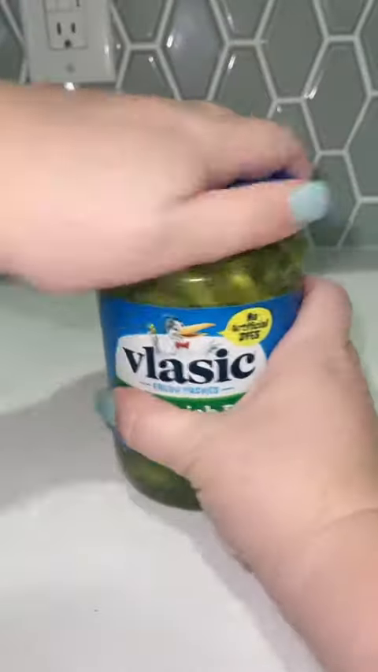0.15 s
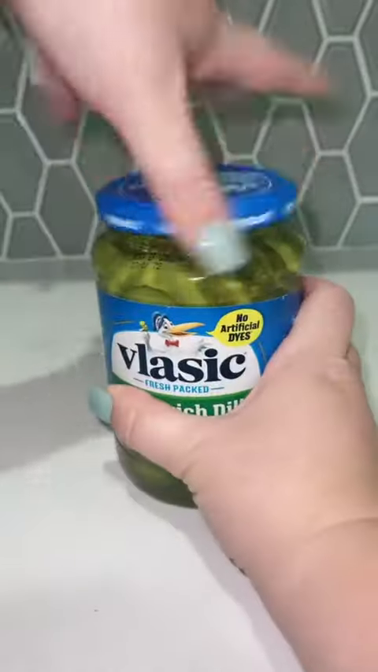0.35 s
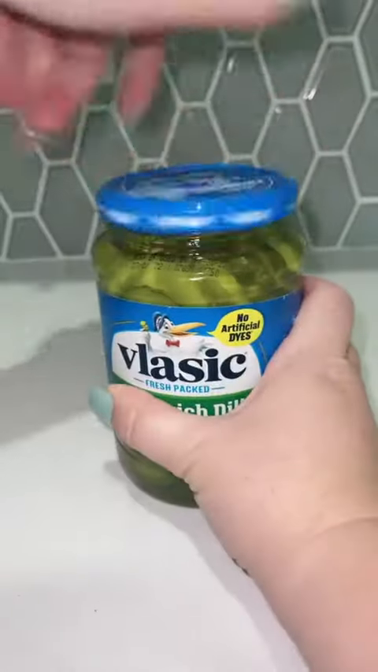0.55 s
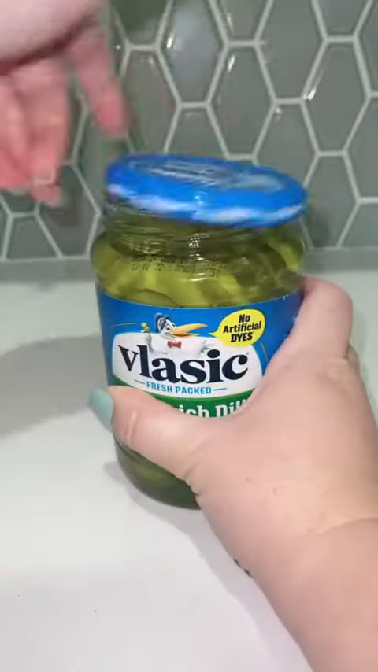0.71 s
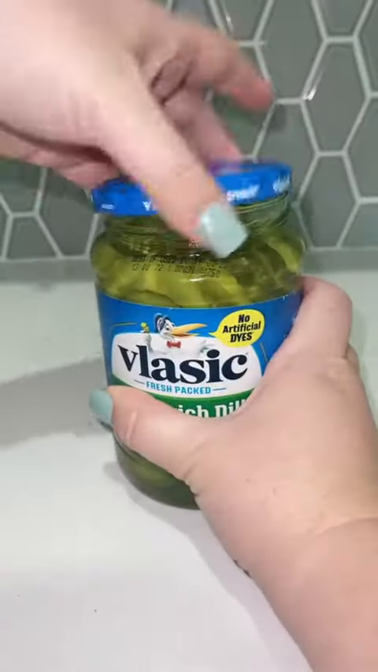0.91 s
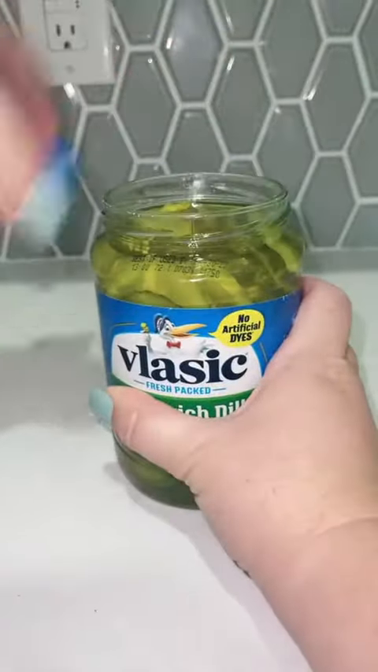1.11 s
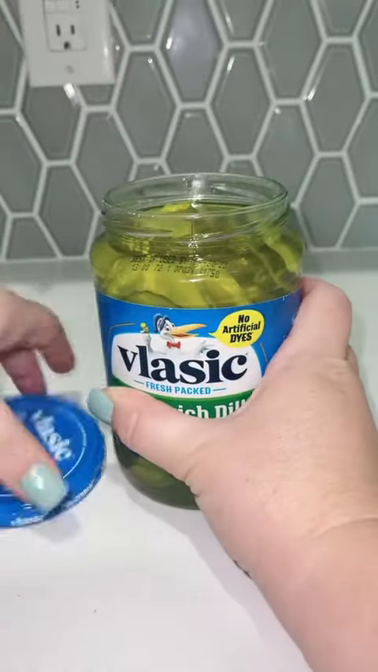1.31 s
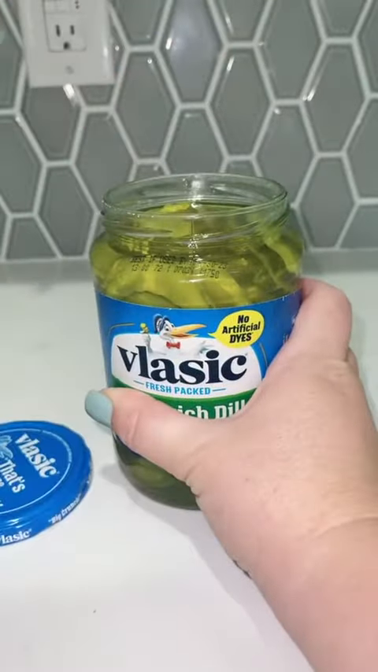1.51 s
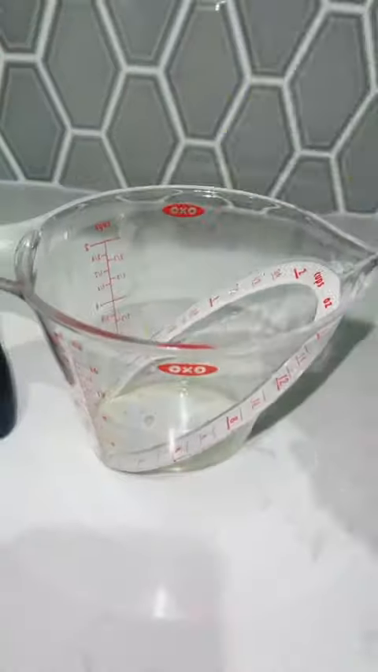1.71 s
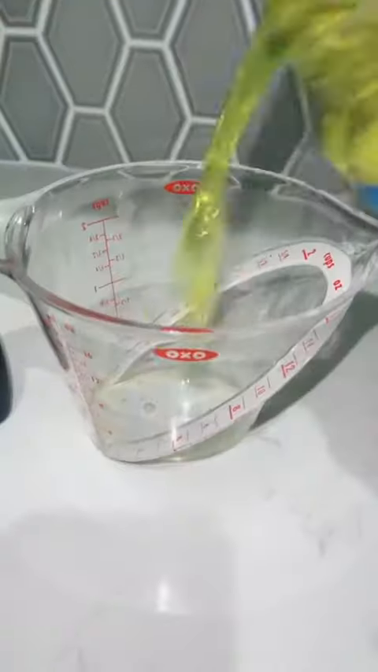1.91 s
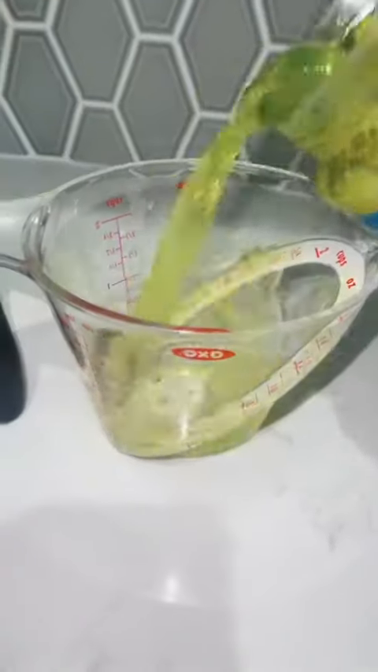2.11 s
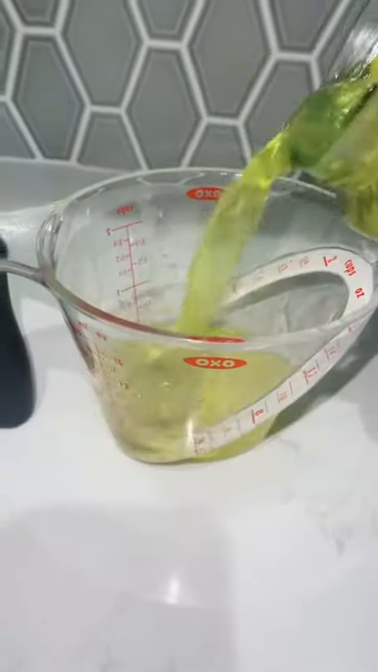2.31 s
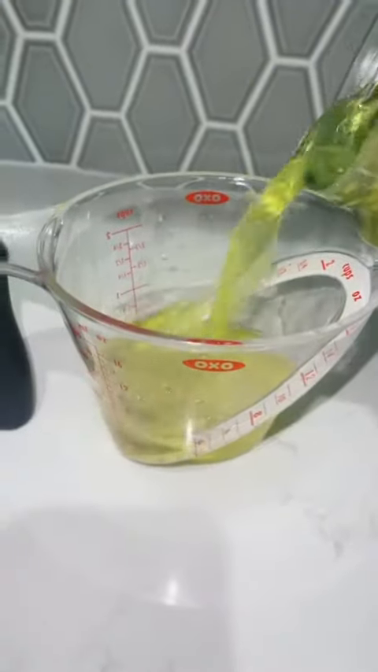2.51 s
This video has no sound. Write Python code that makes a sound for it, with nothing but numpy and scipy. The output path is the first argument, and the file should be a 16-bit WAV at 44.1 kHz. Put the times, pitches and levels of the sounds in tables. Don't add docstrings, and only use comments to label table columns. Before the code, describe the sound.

A thin steel lid twists off a glass jar: soft palm touches at 0.1 s, then gritty scrapes and metallic rattles from 0.2 to 0.85 s, loudest near 0.73. At 1.3 s it clacks onto a stone counter, rocks and settles by 1.55. Near-silence from 1.72 to 1.83 s, then brine trickles, splashing and bubbling in a plastic jug from about 2 s. Close phone microphone, low hum, small tiled kitchen.

```python
import sys
import numpy as np
from scipy import signal
from scipy.fft import rfft, irfft, next_fast_len
from scipy.io import wavfile
from scipy.ndimage import uniform_filter1d

SR = 44100
rng = np.random.default_rng(int(sys.argv[2]) if len(sys.argv) > 2 else 0)


def to_wav(sig):
    pcm = np.clip(np.atleast_2d(sig), -1, 1) * 32767
    pcm = np.round(pcm).astype(np.int16)
    wavfile.write(sys.argv[1], SR, pcm.T)


def makeup_ratio(level_db):
    decades = np.asarray(level_db, float) / 20
    return 10 ** decades


N = 114660

ROOM_T60_S, ROOM_TREBLE_T60_S, ROOM_DB = 0.53, 0.15, -19
CUT_S, BACK_S, CUT_FALL_S, CUT_DB = 1.722, 1.829, 0.0022, -52
TOP_HZ = 15650

# frequency [Hz], density [dB per Hz].
HUM_SPECTRUM = [(25, -14), (70, -7.5), (125, 2.5), (175, -10), (240, -8.5), (500, -17), (3500, -26.5),
                (10000, -50.5)]
# time [s], gain [dB].
HUM_GAIN = [(0, 1), (.3, 7.5), (1.25, 6.5), (1.32, 1.5), (1.7, 6), (1.83, -10.5), (1.92, -16), (1.95, -6.5),
            (2.2, 2.5), (2.6, 8)]
# frequency [Hz], density [dB per Hz].
MIC_HISS_SPECTRUM = [(9000, -30), (12000, -5.5), (14000, 2), (16000, 0)]
HUM_DB, MIC_HISS_DB = -59.5, -85.5

# time [s], level [dB].
STREAM = [
    (1.93, -93),
    (2.055, -77.5),
    (2.08, -54),
    (2.24, -48),
    (2.3, -55),
    (2.6, -54),
]
# frequency [Hz], density [dB per Hz].
FIZZ_SPECTRUM = [(250, -49), (557, -4.5), (1420, 0.5), (1760, -3.5), (2400, 0), (3280, -5), (11500, -19.5),
                 (15000, -18)]
# start [s], level [dB], bubble pitch [Hz], decay [s], spray [dB].
SPLASHES = [(1.953, -57, 1553, 0.027, -10), (1.986, -63, 5870, 0.016, 8.5), (2.011, -50, 5680, 0.021, -1.5),
            (2.069, -46, 2130, 0.013, -3.5), (2.08, -34.5, 768, 0.009, -14),
            (2.086, -34.5, 4550, 0.0057, -18), (2.142, -37.5, 5620, 0.0045, -7),
            (2.148, -36, 2290, 0.0058, -8.5), (2.158, -34.5, 800, 0.011, -14),
            (2.19, -26.5, 770, 0.0051, -33), (2.19, -28.5, 1470, 0.0027, -30),
            (2.228, -25, 1420, 0.0052, -21), (2.327, -42.5, 1455, 0.0093, -9.5),
            (2.371, -37.5, 2275, 0.0083, -14.5), (2.39, -43, 1420, .007, -26),
            (2.431, -41.5, 4970, .006, -7), (2.453, -38, 1420, .008, -18), (2.476, -42, 2430, .012, -0.5),
            (2.537, -39.5, 4220, 0.0036, -18), (2.547, -32.5, 510, 0.0088, -27),
            (2.547, -31, 1380, 0.0062, -28), (2.589, -36, 2260, 0.0043, -15.5),
            (2.592, -32.5, 1320, .006, -18)]
# pitch [Hz], level [dB], time to fall 60 dB [s].
JUG_MODES = [(820, -3, 0.056), (1420, -1.5, 0.06), (1890, -1, 0.022), (2420, 2.5, 0.014),
             (3120, -22, 0.045), (4240, -1, 0.024)]
JUG_DB, FIZZ_DB, FLICKER_DB, BUBBLE_DB, PLOP_DB = -11.5, 3, 1.8, -11, -0.5
GLIDE = 0.093

# start [s], length [s], level [dB], fade over its length [dB].
SLIDES = [
    (0.203, 0.024, -43.5, -0.5),
    (0.303, 0.062, -26.5, -10.5),
    (0.374, 0.045, -35, -4.5),
    (0.508, 0.11, -25.5, -5),
    (.697, .02, -27.5, -4),
    (0.733, 0.041, -23.5, -5.5),
    (0.779, .11, -43.5, -10.5),
    (1.293, 0.041, -34, 2),
    (1.339, 0.11, -32, -6.5),
    (1.447, 0.26, -54, -17.5),
]
# frequency [Hz], density [dB per Hz].
RIM_SPECTRUM = [(3000, -30), (6000, -8), (9500, -4.5), (11300, -12), (13300, -3.5), (16000, -0.5)]
# pitch [Hz], width [Hz], level over the hiss [dB].
RIM_MODES = [(6500, 160, 8), (8450, 170, 5), (9920, 340, 4.5), (12260, 280, 2.5), (13600, 380, 5)]

# start [s], level [dB], favoured pitch [Hz], decay [s], rise [s].
PALM = [
    (.112, -32, 600, .012, 0.0086),
    (.13, -37.5, 700, .015, 0.0052),
    (.158, -30, 520, .012, 0.01),
    (.212, -22.5, 680, .015, 0.0052),
    (.92, -37, 340, .025, 0.0027),
]
# pitch [Hz], level [dB], time to fall 60 dB [s].
JAR_MODES = [(340, -1.5, 0.09), (575, -10, .025), (680, -7, 0.1)]

# start [s], level [dB], favoured pitch [Hz], scrape decay [s], rise [s].
TWIST = [(.196, -18, 2230, 0.0078, 0.0084), (.214, -14.5, 2040, 0.005, 0.0043),
         (.236, -29.5, 2330, 0.022, 0.02), (.29, -20, 2330, 0.0033, 0.0045), (.301, -9, 2330, 0.01, 0.0032),
         (.322, -18, 2330, 0.013, 0.006), (.372, -20, 1610, 0.033, 0.0039),
         (.398, -34.5, 2510, 0.01, 0.0076), (.463, -20, 1650, 0.022, 0.0013),
         (.484, -24, 530, 0.011, 0.0045), (.503, -9.5, 1160, 0.019, 0.0023),
         (.533, -10, 2510, 0.026, 0.00093), (.566, -11.5, 1170, 0.0061, 0.02),
         (.592, -17.5, 1170, 0.027, 0.0076), (.67, -19.5, 1180, 0.021, 0.0027),
         (.695, -8.5, 1630, 0.011, 0.0083), (.728, -9.5, 2320, 0.0083, 0.007),
         (.752, -16.5, 2320, 0.019, 0.0038), (.81, -20, 2370, 0.01, 0.0073),
         (.85, -21.5, 1070, 0.01, 0.0072), (.916, -33, 1060, 0.0069, 0.0048),
         (.929, -27.5, 1170, 0.014, 0.002)]
# start [s], level [dB], favoured pitch [Hz], scrape decay [s], rise [s].
DROP = [
    (1.292, -24.5, 2310, 0.019, 0.0082),
    (1.303, -11, 4030, 0.014, 0.016),
    (1.315, -7.5, 1490, 0.0037, 0.00033),
    (1.34, -15.5, 4030, 0.014, 0.018),
    (1.366, -22, 2330, 0.03, 0.0039),
    (1.399, -16.5, 2330, 0.011, 0.0021),
    (1.422, -20, 6460, 0.016, 0.0095),
    (1.485, -32.5, 2330, 0.016, 0.01),
    (1.515, -35.5, 2330, 0.036, 0.0035),
    (1.56, -49, 2330, 0.045, 0.0051),
]
# start [s], level [dB], favoured pitch [Hz].
THREAD_KNOCKS = [(0.2154, -16.5, 2080), (0.3036, -14, 2330), (0.3048, -9.5, 2330), (.328, -15, 2330),
                 (.339, -19, 4070), (0.5052, -12, 1160), (0.51, -11.5, 2330), (0.5141, -12, 1160),
                 (0.5348, -12, 1160), (0.5377, -11.5, 2520), (.575, -9, 1160), (0.5784, -7.5, 2520),
                 (.596, -17, 1160), (0.6716, -14.5, 1180), (0.6981, -13, 1640), (.705, -10.5, 1640),
                 (.712, -13.5, 1080), (0.7314, -7, 600), (.735, -10.5, 2310), (.741, -11.5, 6480),
                 (0.8175, -21, 1160), (.821, -18.5, 2310), (0.9325, -27.5, 1150)]
# start [s], level [dB], favoured pitch [Hz].
COUNTER_KNOCKS = [
    (1.309, -16, 1490),
    (1.3159, -4, 1490),
    (1.32, -10, 1490),
    (1.347, -16.5, 4060),
    (1.352, -15, 4025),
    (1.377, -20, 2330),
    (1.4019, -13.5, 2330),
    (1.4054, -13.5, 2330),
    (1.432, -20.5, 6480),
]
# pitch [Hz], level [dB], time to fall 60 dB [s].
LID_HELD_MODES = [(552, -14.5, 0.18), (616.4, -7.5, 0.055), (909, -8.5, 0.12), (1080, -8, 0.066),
                  (1168, -7.5, .08), (1647, -6, 0.064), (2210, -16.5, .03), (2314, -4, 0.07),
                  (2503, -6, .08), (3263, -7.5, 0.091), (3780, -13.5, 0.11), (4080, -8, 0.16),
                  (4525, -8, 0.13), (6480, -4.5, 0.039)]
# pitch [Hz], level [dB], time to fall 60 dB [s].
LID_FREE_MODES = [(600, -13, 0.19), (916, -20, .2), (1490, -4.5, 0.052), (1674, -7.5, 0.0787),
                  (2330, 0, 0.067), (2535, -10, .1), (2790, -15, 0.083), (3776, -15.5, 0.26),
                  (4032, -1, 0.087), (4473, -22.5, .06), (5440, -10, 0.078), (6490, -5.5, .08),
                  (8550, -11.5, 0.0577), (10250, -11.5, .05)]
# frequency [Hz], density [dB per Hz].
GRIT_SPECTRUM = [(150, -50), (450, -16.5), (1200, 0.5), (2400, -3.5), (4300, -1.5), (8000, -6),
                 (13000, -3.5), (16000, -12)]
# frequency [Hz], width [Hz], depth [0-1].
NOTCHES = [(5150, 330, .97), (10750, 450, .85), (14750, 350, .8)]
# start [s], end [s].
FLAT_SPANS = [
    (.51, .69),
    (1.33, BACK_S),
]

HELD_DB, FREE_DB, HELD_GRIT_DB, FREE_GRIT_DB = -9, -12, -9.5, -12.5
FAVOUR_DB_PER_OCT, LUCK_DB = 10.5, 1
CHATTER_PER_S, CHATTER_DB = 8000, 3
WANDER = 0.003
SUSTAIN, STOP_DECAYS = 1.5, 2.6
RIPPLE_DB, RIPPLE_HZ = 3, 170
SOFT_DULL = 0.45
KNOCK_RING_DB, CRACK_DB, CRACK_S = 24.5, -1.5, 0.00073


def unit(x):
    return x / np.sqrt(np.mean(x ** 2) + 1e-20)


def noise():
    return rng.standard_normal(N)


def curve(rows):
    return np.interp(np.arange(N) / SR, *np.array(rows).T[:2])


def colour(x, points):
    hz, db = np.array(points).T
    size = next_fast_len(N)
    f = np.maximum(np.arange(size // 2 + 1) * SR / size, 1)
    gain = makeup_ratio(np.interp(np.log(f), np.log(hz), db))
    return irfft(rfft(x, size) * gain, size)[:N]


def resonate(x, hz, width):
    return signal.lfilter(*signal.iirpeak(hz, hz / width, SR), x)


def walk(rate):
    k = int(SR / rate)
    steps = np.repeat(rng.standard_normal(N // k + 1), k)
    return unit(uniform_filter1d(uniform_filter1d(steps, k), k)[:N])


def chatter(per_s, spread_db):
    when, sign, size = rng.random((3, N))
    hits = (when < per_s / SR) * np.sign(sign - 0.5)
    return unit(hits * makeup_ratio(-spread_db * np.log(size + 0.02)))


def ring(x, hz, t60):
    r = np.exp(-np.log(1000) / (t60 * SR))
    turn = np.exp(2j * np.pi * hz / SR * np.cumsum(1 + WANDER * walk(25)))
    return np.imag(turn * signal.lfilter([np.sqrt(4 * (1 - r))], [1, -r], x / turn))


def bursts(rows, rise):
    u = np.maximum(np.arange(N) / SR - rows[:, :1], 0)
    late = np.maximum(u - rise, 0) / np.maximum(rows[:, 3:4], 1e-3)
    onset = np.sin(np.pi / 2 * np.minimum(u / rise, 1)) ** 2
    return makeup_ratio(rows[:, 1:2]) * onset * np.exp(-late / SUSTAIN - (late / STOP_DECAYS) ** 4)


def struck(rows, modes, rise, force, knocks=()):
    modes, env, count = np.array(modes), bursts(rows, rise), len(rows)
    favoured = np.array([row[2] for row in [*rows, *knocks]])
    octaves = np.abs(np.log2(modes[:, 0] / favoured[:, None]))
    loss_db = FAVOUR_DB_PER_OCT * np.sqrt(np.minimum(octaves, 2))
    share = makeup_ratio(modes[:, 1] - loss_db + LUCK_DB * rng.standard_normal(octaves.shape))
    drives = share[:count].T @ env * force
    for (s, db, _), part in zip(knocks, share[count:]):
        drives[:, int(s * SR)] += makeup_ratio(db + KNOCK_RING_DB) * part
    tone = sum(ring(drive, hz, t60) for drive, (hz, _, t60) in zip(drives, modes))
    return tone, env


def kitchen():
    hum = unit(colour(noise(), HUM_SPECTRUM))
    hum = hum * makeup_ratio(HUM_DB + curve(HUM_GAIN) + 0.53 * walk(8.9))
    hiss = unit(colour(noise(), MIC_HISS_SPECTRUM))
    return hum + hiss * makeup_ratio(MIC_HISS_DB + 3.5 * walk(12))


def room(x):
    u = np.arange(SR // 2) / SR
    low, high = rng.standard_normal((2, len(u)))
    low = unit(uniform_filter1d(low, size=8)) * makeup_ratio(-60 * u / ROOM_T60_S)
    high = np.diff(high, prepend=0) * makeup_ratio(5.5 - 60 * u / ROOM_TREBLE_T60_S)
    tail = (low + high) * np.minimum(u / 0.0024, 1)
    return signal.fftconvolve(x, tail / np.sqrt(np.sum(tail ** 2)))[:N]


def add_bubble(track, start, hz, tau, size, rise=1):
    u = np.arange(int(6 * tau * SR)) / SR
    tone = size * np.exp(-u / tau) * np.sin(2 * np.pi * hz * (u + GLIDE * u * u / (4 * tau)))
    i = int(start * SR)
    track[i:i + len(tone)] += tone * np.minimum(np.arange(len(tone)) / rise, 1)


def small_bubbles():
    track = np.zeros(N + SR)
    for when, pitch, size in rng.random((400, 3)):
        hz = 500 * 2 ** (2.96 * pitch)
        add_bubble(track, 1.5 + when, hz, 3.6 / hz, makeup_ratio(-6 * np.log(size + 0.012)))
    return unit(track[:N])


def splashes():
    rows, plops = np.array(SPLASHES), np.zeros(N + SR)
    for s, db, hz, tau, _ in SPLASHES:
        add_bubble(plops, s + 0.000997, hz, 0.68 * tau, makeup_ratio(db), rise=60)
    jug, env = struck(rows, JUG_MODES, 0.28 * rows[:, 3:4], noise())
    spray = unit(colour(noise(), [(1500, -19), (5500, 4), (12000, -8), (16000, -1)]))
    return makeup_ratio(PLOP_DB) * plops[:N] + makeup_ratio(JUG_DB) * jug + (makeup_ratio(rows[:, 4]) @ env) * spray


def pour():
    flow = makeup_ratio(curve(STREAM)) * (np.arange(N) / SR > 1.93)
    fizz = unit(colour(noise() + chatter(1500, 2.8), FIZZ_SPECTRUM))
    fizz = fizz * makeup_ratio(FIZZ_DB + FLICKER_DB * walk(60))
    steady = struck(np.array([(1.9, 0, 1600, 100)]), JUG_MODES, 0.004, chatter(900, 2.9))[0]
    return flow * (fizz + makeup_ratio(BUBBLE_DB) * small_bubbles() + makeup_ratio(-7.5) * steady) + splashes()


def slide():
    t, env = np.arange(N) / SR, np.zeros(N)
    for s, length, db, fade_db in SLIDES:
        env += ((t > s) & (t < s + length)) * makeup_ratio(db + fade_db * np.clip((t - s) / length, 0, 1))
    hiss = unit(colour(noise() + 0.32 * chatter(3000, 3.5), RIM_SPECTRUM))
    hiss = uniform_filter1d(env, size=90) * hiss * makeup_ratio(2 * walk(120))
    modes = sum(makeup_ratio(db + 2.3 * walk(30)) * resonate(hiss, hz, width) for hz, width, db in RIM_MODES)
    return 0.69 * hiss + modes


def notched(x):
    for hz, width, depth in [*NOTCHES, NOTCHES[0]]:
        x = x - depth * resonate(x, hz, width)
    return x


def lid_flat():
    t = np.arange(N) / SR
    flat = sum(1.0 * ((t > start) & (t < end)) for start, end in FLAT_SPANS)
    return uniform_filter1d(flat, size=800)


def grit_noise(force):
    bands = np.arange(100, SR / 2, RIPPLE_HZ)
    ripple = np.array([bands, RIPPLE_DB * rng.standard_normal(len(bands))]).T
    grit = colour(0.11 * force + noise(), ripple)
    return unit(colour(grit, GRIT_SPECTRUM)) * makeup_ratio(0.4 * walk(150))


def contacts(rows, modes, ring_db, grit_db, knocks=()):
    rows, force = np.array(rows), chatter(CHATTER_PER_S, CHATTER_DB)
    tone, env = struck(rows, modes, rows[:, 4:], force, knocks)
    grit = grit_noise(force)
    low = signal.lfilter(*signal.butter(2, 5000, fs=SR), grit)
    high = grit - low
    brightness = np.minimum(makeup_ratio(SOFT_DULL * (rows[:, 1] + 6.5)), 1)
    scrape = env.sum(0) * low + uniform_filter1d(brightness @ env, size=300) * high
    crack = np.zeros(N)
    for s, db, _ in knocks:
        crack[int(s * SR)] = makeup_ratio(db + grit_db + CRACK_DB)
    crack = signal.lfilter([1], [1, -np.exp(-1 / (CRACK_S * SR))], crack)
    return makeup_ratio(ring_db) * tone + makeup_ratio(grit_db) * scrape + (low + 0.71 * high) * crack


def lid():
    twisted = contacts(TWIST, LID_HELD_MODES, HELD_DB, HELD_GRIT_DB, THREAD_KNOCKS)
    dropped = contacts(DROP, LID_FREE_MODES, FREE_DB, FREE_GRIT_DB, COUNTER_KNOCKS)
    return twisted + dropped


def scene():
    palm = contacts(PALM, JAR_MODES, -5.5, -13.5)
    near = lid() + slide() + palm + pour()
    near = signal.sosfilt(signal.butter(3, 280, "high", fs=SR, output="sos"), near)
    near = near + makeup_ratio(ROOM_DB) * room(near)
    near = near + lid_flat() * (notched(near) - near)
    return (near + kitchen())[None]


def low_pass(x):
    return signal.sosfilt(signal.butter(12, 16470, fs=SR, output="sos"), x)


def record(dry):
    t = np.arange(N) / SR
    mix = signal.sosfilt(signal.ellip(8, 0.3, 70, TOP_HZ, fs=SR, output="sos"), dry)
    gate = np.where(t < BACK_S, np.exp(-np.maximum(t - CUT_S, 0) / CUT_FALL_S), 1)
    mix = mix * np.maximum(gate, makeup_ratio(CUT_DB))
    return low_pass(mix)


dry = scene()
out = record(dry)
to_wav(out)
```